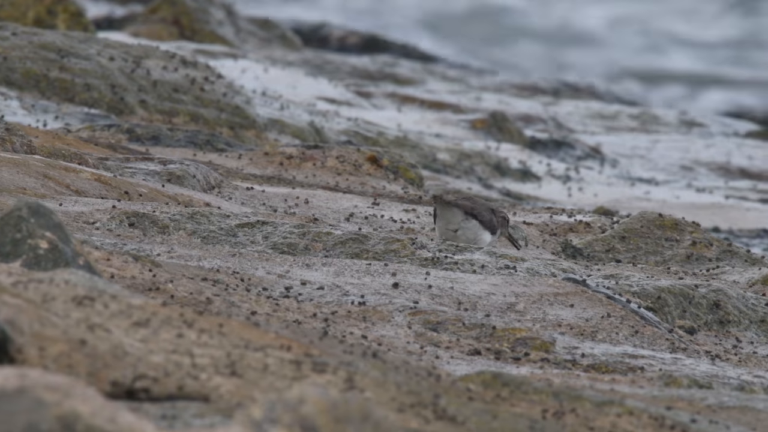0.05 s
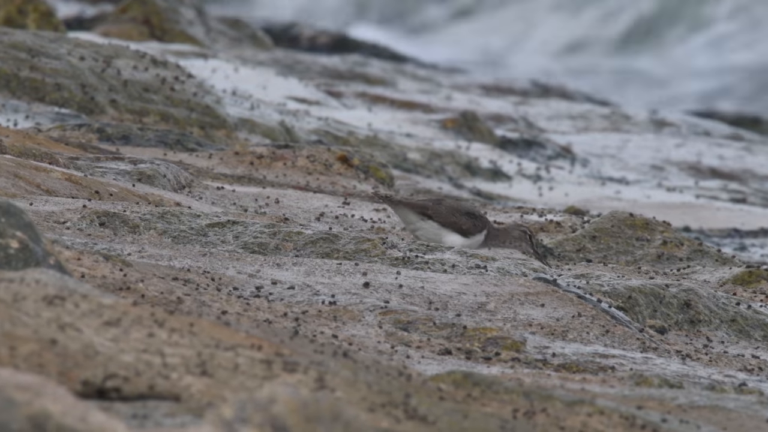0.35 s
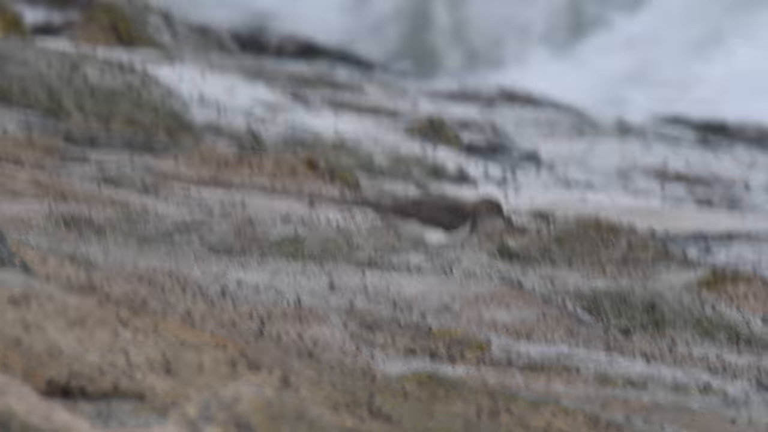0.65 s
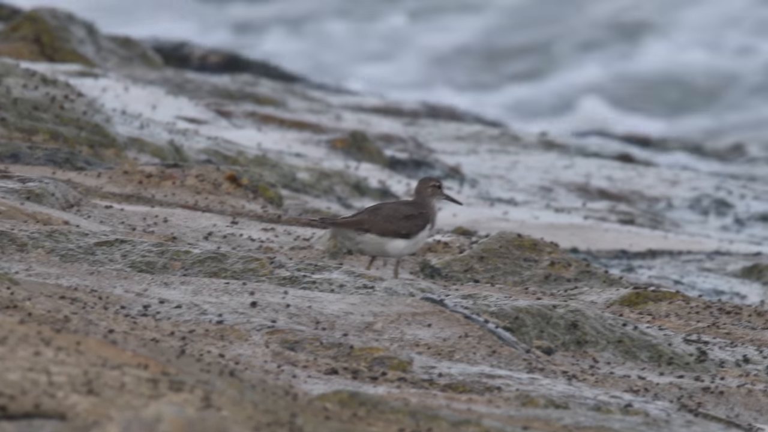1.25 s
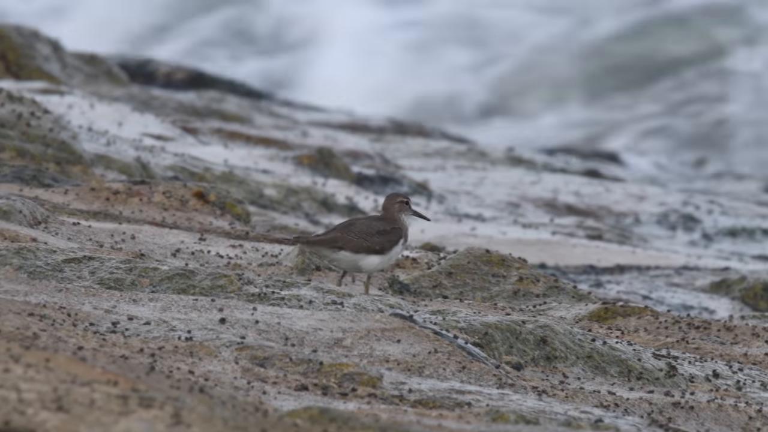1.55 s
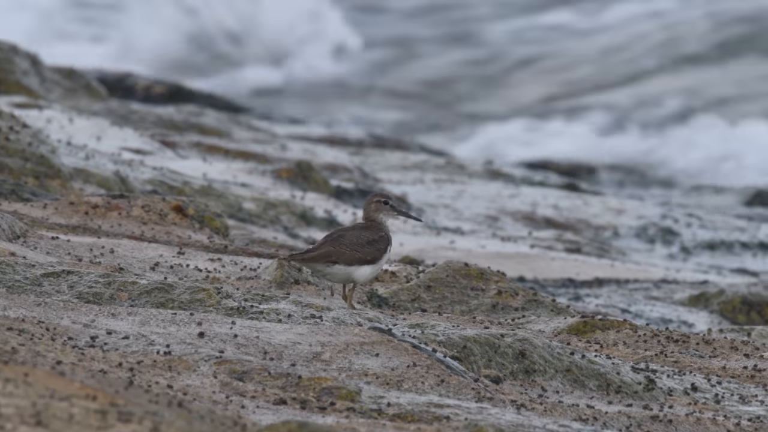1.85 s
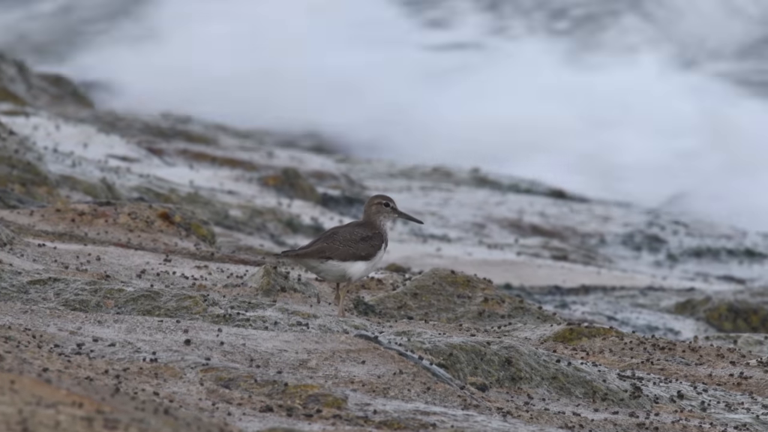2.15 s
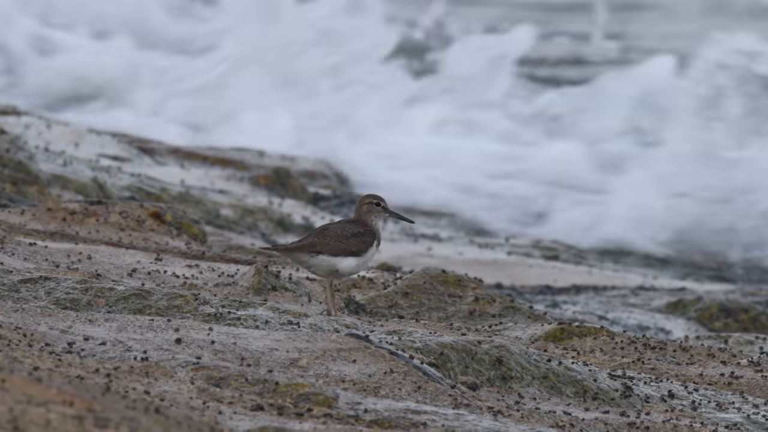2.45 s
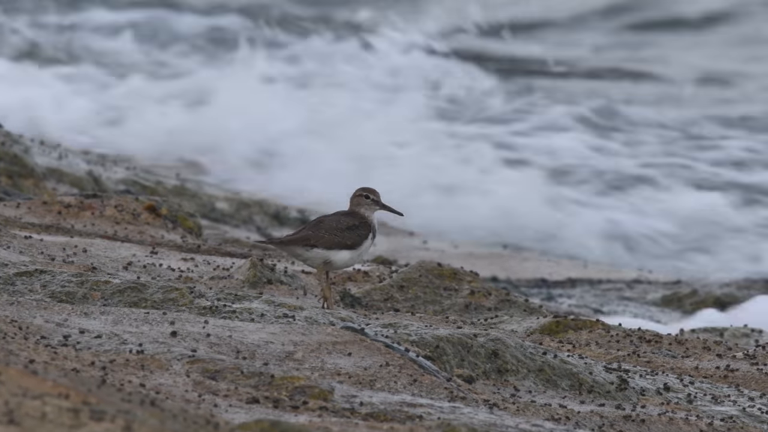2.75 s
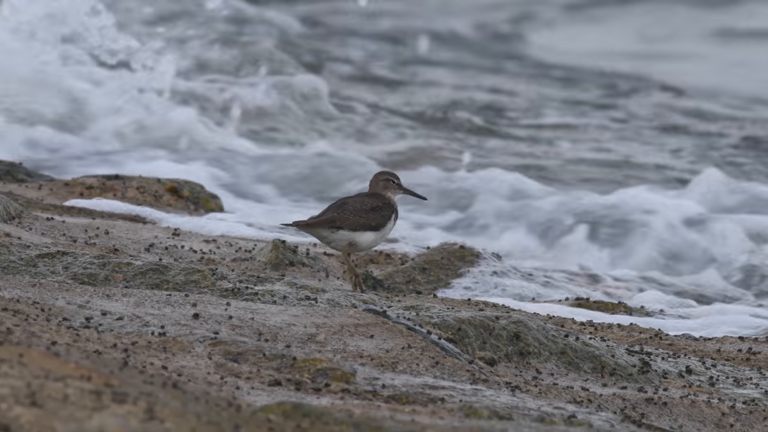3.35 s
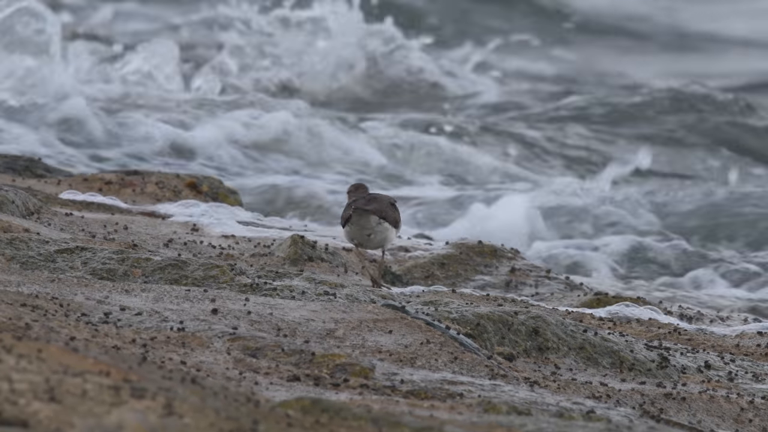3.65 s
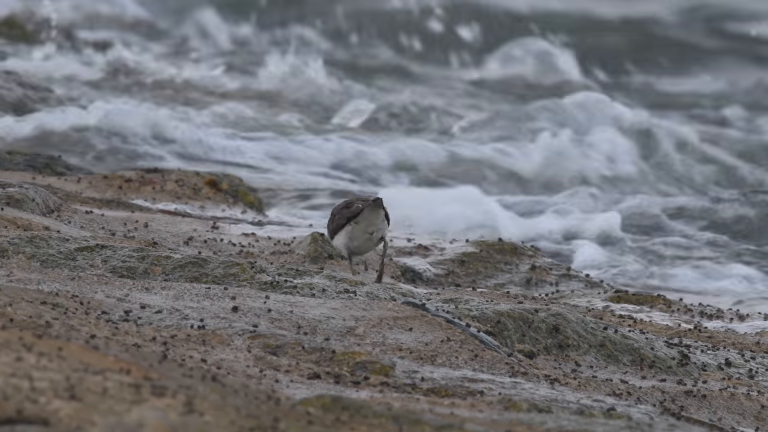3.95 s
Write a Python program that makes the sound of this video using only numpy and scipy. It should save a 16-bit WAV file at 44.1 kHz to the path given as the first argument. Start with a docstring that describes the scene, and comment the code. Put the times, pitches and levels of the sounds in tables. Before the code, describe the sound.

Wind buffets the microphone in uneven gusts, with surf hissing on a rocky shore behind it. A wave breaks to the right with a faint splash, then foam washes up as the gusts grow stronger and pop.

```python
"""Lumpy gusts of wind thump the microphone, with surf hissing on a rocky shore behind them.
About a second in, a wave breaks to the right; foam washes up the rock and a few drops splash.
The surf is countless bubbles merged into churning noise: a roar, a fizz of spray and a hiss of foam.
The wind is turbulence tumbling over the microphone's ports, louder and brighter in each gust.
Single eddies land as buffets and sharp pops; the hardest pops overload the right channel."""
import sys
import numpy as np
from scipy import signal
from scipy.fft import rfft, irfft
from scipy.io import wavfile
from scipy.ndimage import uniform_filter1d, minimum_filter1d

SR = 44100
rng = np.random.default_rng(int(sys.argv[2]) if len(sys.argv) > 2 else 0)


def to_wav(sig):
    """Store sig (one row per channel, or 1-D mono) as 16-bit WAV at the path in sys.argv[1].

    Samples outside -1..1 are clipped; the rate is SR.
    """
    pcm = np.clip(np.atleast_2d(sig), -1, 1) * 32767
    pcm = np.round(pcm).astype(np.int16)
    wavfile.write(sys.argv[1], SR, pcm.T)  # frames by channels


N = 176400

# Fader moves for the foam on the rock, the breaking waves and the spray they throw up.
# Each row: time in seconds, level in dB.
FOAM_LEVEL = [(0, -4.5), (.6, -0.5), (1.5, -1), (2, -5), (2.4, -2), (2.95, -1.5), (3.2, -2.5), (3.5, -4),
              (3.8, -2), (4, -3.5)]
BREAKER_LEVEL = [(0, -18.5), (.3, -12), (.65, -6.5), (.9, 0.5), (1.03, -2), (1.17, 1.5), (1.4, -5),
                 (1.65, -9.5), (2.05, -12.5), (2.6, -14.5), (2.88, -10), (3.08, -13), (3.2, -22),
                 (3.5, -27), (4, -36)]
SPRAY_LEVEL = [(0, -20), (.35, -16), (.6, -8.5), (.77, -4.5), (.88, 1.5), (1.02, -1.5), (1.17, 1),
               (1.38, -3.3), (1.45, -.3), (1.58, -7), (1.66, -5), (1.85, -7.5), (2.1, -11), (2.4, -10),
               (2.55, -13.5), (3.1, -16.5), (3.45, -25), (3.66, -13.5), (3.82, -16), (4, -23)]
# The tone of those three layers. Each row: frequency in Hz, noise density in dB per Hz.
FOAM_HISS = [(20, -102), (130, -59.5), (300, -53), (700, -63), (1100, -58), (1600, -59), (2400, -60.5),
             (3100, -71.5), (4300, -69), (6500, -77.5), (7200, -84.5), (8600, -86.5), (12000, -94.5),
             (13300, -104), (15000, -116)]
BREAKER_ROAR = [(20, -95), (130, -68), (300, -58.5), (700, -54.5), (1000, -52), (1400, -51), (2450, -52),
                (3100, -63.5), (4200, -68), (6000, -77), (9000, -100), (15000, -120)]
SPRAY_FIZZ = [(20, -120), (2500, -72), (4200, -76.5), (5200, -64), (6500, -64), (7100, -71.5),
              (8600, -78.5), (12000, -85.5), (13300, -94), (15000, -107)]
# Stereo images of the surf and of the wind, from which the left port is sheltered. Each row:
# frequency in Hz, left level against right in dB, left phase lead in radians, likeness from 0 to 1.
SURF_IMAGE = [(100, 0, 0, .999), (250, -1, 0, .99), (550, -4.5, -.1, .88), (850, -7, -1.0, .45),
              (1150, -9.5, -3.0, .25), (1500, -9.5, -2.8, .72), (2500, -11.3, -2.45, .78),
              (3200, -6, -2.9, .45), (4200, -6.6, -4.2, .42), (6300, -10, -5.4, .62),
              (8500, -2.5, -7.5, .2), (12000, .2, -6.2, .5)]
WIND_IMAGE = [(90, 0, 0, .9998), (160, -.4, .02, .9995), (250, -1.3, .04, .999), (500, -4.9, .12, .992),
              (800, -10, .4, .96), (1200, -15, .95, .8), (2500, -16, 1.6, .3)]
# Drops landing nearby. Each row: time of the peak in seconds, level before panning in dB.
DROP_HITS = [(.247, -49), (1.04, -39), (3.66, -54)]
# The rise and fall of the gusts. Each row: time in seconds, wind strength in dB.
GUSTS = [(0, -7), (.16, -12), (.21, -18.5), (.3, -8), (.41, -26.5), (.47, -7.5), (.5, -15), (.54, -9.5),
         (.6, -27), (.68, -10.5), (.8, -11.5), (.92, -3.5), (1.05, -15), (1.22, -20), (1.32, 2.5),
         (1.42, -20), (1.47, -6.5), (1.59, -17), (1.62, 3.5), (1.72, -1), (1.81, -2), (1.88, -14.5),
         (2.05, -1), (2.15, 1), (2.25, 4.5), (2.46, 6.5), (2.57, -2.5), (2.595, -22), (2.64, 1.5),
         (2.71, 5.5), (2.77, -20), (2.81, -17), (2.85, -5.5), (2.95, -9), (3.0, -6.5), (3.05, 4),
         (3.15, -9), (3.21, -9), (3.28, -2.5), (3.36, -7), (3.47, 0.5), (3.59, -15), (3.66, -6.5),
         (3.71, -5.5), (3.745, 6), (3.83, 2.5), (3.92, 1), (4, -8)]
# The wind's basic tone at the right port. Each row: frequency in Hz, noise density in dB per Hz.
WIND_TONE = [(10, -110), (25, -82), (40, -83), (62, -53), (100, -46.5), (160, -43.5), (240, -40),
             (350, -43), (550, -44.5), (950, -50.5), (1400, -63), (2200, -75.5), (3200, -106), (7000, -110)]
# How hard the wind drives each band. Each row: centre in Hz, dB per dB of gust, dB per dB of eddy.
BAND_DRIVE = [(59.6, 0.05, 1.4), (160, 0.37, 0.3), (350, 0.5, 1.37), (870, 0.86, 2.16), (1800, 1.24, 5)]
# Thumps from single large eddies. Each row: time in seconds, peak of the push in dB, centre in Hz,
# level of the puff in dB, half length of the puff in seconds.
BUFFET_HITS = [(.0266, -14, 290, -19.5, 0.013), (.0369, -9, 364, -21, 0.0034),
               (.095, -17, 555, -18.5, 0.0059), (.146, -19, 523, -19, 0.0088),
               (.175, -0.5, 292, -10.5, 0.0058), (0.2572, -5.5, 326, -13, 0.0028),
               (.4507, -14, 310, -25, 0.0025), (0.5386, -4, 320, -18.5, 0.017),
               (0.7565, 7, 520, -10, 0.004), (1.0534, -13, 236, -15, 0.0033),
               (1.1453, -10, 420, -18, 0.0041), (1.315, -7, 600, -17, 0.0073), (1.391, 1, 366, -21, .003),
               (1.528, -6, 218, -19, .004), (1.6195, -4, 330, -26, .004), (1.6344, -3.5, 320, -21, 0.0024),
               (1.6545, 3, 350, -22, 0.0036), (1.7685, -4, 634, -17, 0.0067),
               (1.7922, -2, 350, -28, 0.0036), (1.9574, -5.5, 500, -21, 0.0048),
               (2.0319, -4, 456, -15, 0.0089), (2.1288, -6, 258, -27, 0.0023),
               (2.146, -9, 750, -21, 0.0022), (2.2029, -2, 340, -18, 0.0065),
               (2.2845, -1, 500, -16, 0.0076), (2.3394, -8, 340, -19, 0.0036),
               (2.3503, -1, 360, -14, 0.0091), (2.452, -8, 240, -23, .005), (2.4749, -7, 310, -18, .003),
               (2.5158, -9, 270, -17, 0.0035), (2.6447, -4, 390, -14, 0.0026),
               (2.6892, -8, 259, -16, 0.0068), (2.7168, -2, 567, -12.5, 0.0055),
               (2.8241, 4, 270, -9.5, 0.0038), (2.839, -11, 540, -15, .005), (2.8984, -3, 240, -15, .004),
               (2.9295, 4, 377, -7, 0.0024), (3.05, -10, 615, -17, 0.0055), (3.067, -7, 514, -25, 0.0024),
               (3.1415, 0, 270, -14.5, 0.017), (3.2636, -2, 460, -19, 0.0037),
               (3.2742, 2, 370, -16, 0.0026), (3.4069, -4.5, 470, -18, 0.0023), (3.552, 1, 390, -13, 0.01),
               (3.6254, 3.5, 256, -12, .006), (3.7491, 0, 468, -12, .0057), (3.7762, -7, 450, -25, .004),
               (3.8192, 1, 580, -13, 0.0062), (3.8423, -1, 400, -13.5, .004),
               (3.8883, -5.5, 483, -13.5, 0.01), (3.9467, -3, 332, -12.5, 0.0069)]
# Sharp pressure swings. Each row: time in seconds, peak in dB, half length in seconds.
POP_HITS = [(2.2508, 3.5, 0.0002), (2.4385, -4, .00025), (2.4454, 2.5, 0.00015), (2.926, -2.5, 0.00021)]
# Narrow dips in the microphone's treble. Each row: centre in Hz, width in Hz.
MIC_NOTCHES = [(7690, 410), (9620, 400)]

SEETHE_DB, SEETHE_HZ = 0.67, 25  # depth and rate of the flutter on a whole surf layer
CHURN_DB, CHURN_S, CHURN_HZ = 1.42, 0.061, 700  # depth, length and width of patches in churning water
DROP_DECAY_S, DROP_HZ, DROP_OCTAVES = 0.0037, 8900, 0.35
LUMP_DB, LUMP_HZ = 0.5, 30.2  # slower lumps in a gust; BAND_DRIVE scales the depth
EDDY_DB, EDDY_HZ = 3.5, 168  # small, fast eddies; BAND_DRIVE scales the depth
EDDY_CAP = 1.15  # the strongest eddies, in standard deviations
PUSH_OCTAVES, PUFF_OCTAVES = 0.88, 0.74  # bandwidths of a buffet's two parts
GUST_CEILING, LIMITER_S = .93, .0006
LOW_CUT_HZ, HIGH_CUT_HZ = 35, 15200


def amp(db):
    """Decibels to gain."""
    return 10 ** (np.asarray(db) / 20)


def unit_rms(x):
    """Scales to rms 1."""
    return x / np.sqrt(np.mean(x ** 2) + 1e-20)


def columns_at(table, hz):
    """Each column of a table, read on a log-frequency axis."""
    table_hz, *columns = np.transpose(table)
    return [np.interp(np.log(hz + 1), np.log(table_hz), column) for column in columns]


def curve(points, t):
    """A control curve at the times t."""
    return np.interp(t, *np.transpose(points))


def add(mix, start_s, sound):
    """Mixes a sound in at start_s, or at zero if that is earlier."""
    part = mix[max(round(start_s * SR), 0):][:len(sound)]
    part += sound[:len(part)]


def bins(size):
    """The frequencies of a spectrum, in Hz."""
    return np.fft.rfftfreq(size, 1 / SR)


def bell(size, hz, octaves):
    """A smooth bell-shaped band around one frequency."""
    return np.exp(-.5 * (np.log2((bins(size) + 1) / hz) / octaves) ** 2)


def noise_spectrum(tone):
    """The spectrum of random noise with the given tone."""
    density_db = columns_at(tone, bins(N))[0]
    return rfft(rng.standard_normal(N)) * amp(density_db) * np.sqrt(SR / 2)


def wander(hz):
    """Random modulation up to a rate, rms 1."""
    return unit_rms(irfft(rfft(rng.standard_normal(N)) / (1 + (bins(N) / hz) ** 4), N))


def burst(envelope, hz, octaves):
    """A short puff of noise around one frequency, as strong as its envelope."""
    size = len(envelope)
    puff = irfft(bell(size, hz, octaves) * rfft(envelope * rng.standard_normal(size)), size)
    return unit_rms(puff) * np.sqrt(np.mean(envelope ** 2))


def stereo(right, unrelated, image):
    """The left port hears the right one's sound weaker, phase-shifted and partly unrelated."""
    db, phase, likeness = columns_at(image, bins(N))
    blend = likeness * rfft(right) + np.sqrt(1 - likeness ** 2) * rfft(unrelated)
    left = irfft(amp(db) * np.exp(1j * phase) * blend, N)
    return np.array([left, right])


def surf(tone, level):
    """Countless bubbles merge into a noise that churns in patches and swells with the wave."""
    bubbles = np.array([irfft(noise_spectrum(tone), N) for _ in range(2)])
    bubbles *= amp(SEETHE_DB * wander(SEETHE_HZ))
    hz, t, spectrogram = signal.stft(bubbles, SR, nperseg=512)
    patches = rng.standard_normal((len(t), len(hz))).T
    patches = uniform_filter1d(patches, round(CHURN_S / t[1]), axis=1)
    patches = uniform_filter1d(patches, round(CHURN_HZ / hz[1]), axis=0)
    swell = amp(curve(level, t) + CHURN_DB * unit_rms(patches))
    right, unrelated = signal.istft(spectrogram * swell, SR, nperseg=512)[1][:, :N]
    return stereo(right, unrelated, SURF_IMAGE)


def drops(left_db=1, right_db=-1):
    """Spray lands on the rock with thin, short splashes."""
    out, t = np.zeros(N), np.arange(2048) / SR
    envelope = t / DROP_DECAY_S * np.exp(1 - t / DROP_DECAY_S)
    for peak_s, db in DROP_HITS:
        add(out, peak_s - DROP_DECAY_S, amp(db) * burst(envelope, DROP_HZ, DROP_OCTAVES))
    return out * amp([[left_db], [right_db]])


def turbulence(gust_db, eddy_db):
    """Pressure noise that grows louder and brighter with each gust and eddy."""
    spectrum, out = noise_spectrum(WIND_TONE), np.zeros(N)
    log_centres = np.log([row[0] for row in BAND_DRIVE])
    for solo, (_, by_gust, by_eddy) in zip(np.eye(len(BAND_DRIVE)), BAND_DRIVE):
        crossover = np.interp(np.log(bins(N) + 1), log_centres, solo)
        band = irfft(spectrum * crossover, N)
        out += band * amp(by_gust * gust_db) * unit_rms(amp(by_eddy * eddy_db))
    return out


def buffets():
    """Single large eddies thump the microphone: one push of pressure inside a ragged puff."""
    out, t = np.zeros(N), np.arange(-2048, 2048) / SR
    for time_s, push_db, hz, puff_db, half_s in BUFFET_HITS:
        push = np.fft.fftshift(irfft(bell(len(t), hz, PUSH_OCTAVES)))
        puff = burst(np.exp(-.5 * (t / half_s) ** 2), hz, PUFF_OCTAVES)
        add(out, time_s + t[0], amp(push_db) * push / push.max() + amp(puff_db) * puff)
    return out


def pops():
    """The sharpest eddies are one quick swing of pressure, up and then down."""
    out, t = np.zeros(N), np.arange(-256, 256) / SR
    for time_s, db, half_s in POP_HITS:
        swing = -t / half_s * np.exp(.5 - .5 * (t / half_s) ** 2)
        add(out, time_s + t[0], amp(db) * swing)
    return out


def limiter(pressure):
    """Eases the largest swings of pressure under a ceiling."""
    size = round(LIMITER_S * SR)
    gain = 1 / np.maximum(abs(pressure) / GUST_CEILING, 1)
    held = minimum_filter1d(gain, 2 * size)
    return pressure * uniform_filter1d(uniform_filter1d(held, size), size)


def wind():
    """Gusts full of small eddies strike the right port and, softened, the left."""
    gust_db = curve(GUSTS, np.arange(N) / SR) + LUMP_DB * wander(LUMP_HZ)
    eddy_db = EDDY_DB * EDDY_CAP * np.tanh(wander(EDDY_HZ) / EDDY_CAP)
    rumble, unrelated = turbulence(gust_db, eddy_db), turbulence(gust_db, eddy_db)
    right = limiter(rumble + buffets()) + pops()  # the pops bypass the limiter
    return stereo(right, unrelated, WIND_IMAGE)


def scene():
    """A bed of breaker, spray and foam, with drops nearby and the wind up front."""
    bed = surf(BREAKER_ROAR, BREAKER_LEVEL) + surf(SPRAY_FIZZ, SPRAY_LEVEL) + surf(FOAM_HISS, FOAM_LEVEL)
    return bed + drops() + wind()


def record(dry):
    """The microphone chain: two treble notches and a low cut, overload at full scale, then a high cut."""
    hz = bins(N)
    notches = np.prod([1 - np.exp(-((hz - centre) / width) ** 2) for centre, width in MIC_NOTCHES], 0)
    low_cut = 1 / np.sqrt(1 + (LOW_CUT_HZ / (hz + 1)) ** 8)
    clipped = np.clip(irfft(rfft(dry) * notches * low_cut, N), -1, 1)
    high_cut = signal.firwin(511, HIGH_CUT_HZ, window=("kaiser", 9), fs=SR)
    return signal.oaconvolve(clipped, high_cut[None], "same")


dry = scene()
out = record(dry)
to_wav(out)
```